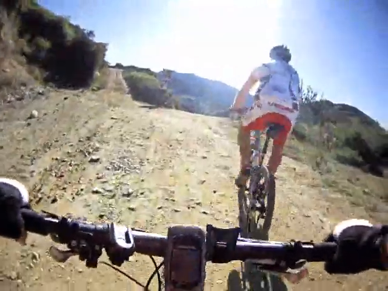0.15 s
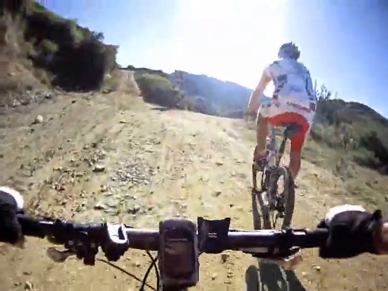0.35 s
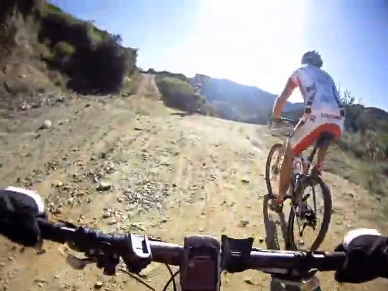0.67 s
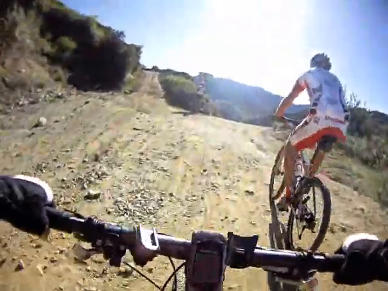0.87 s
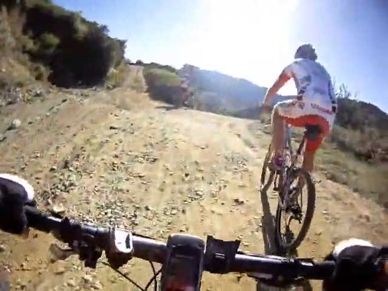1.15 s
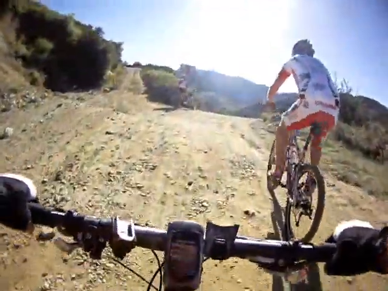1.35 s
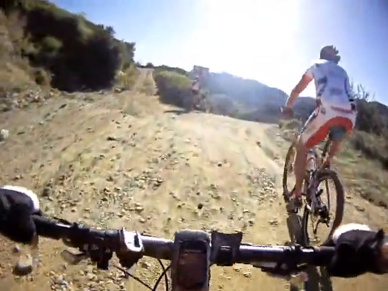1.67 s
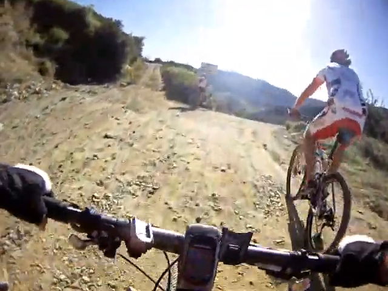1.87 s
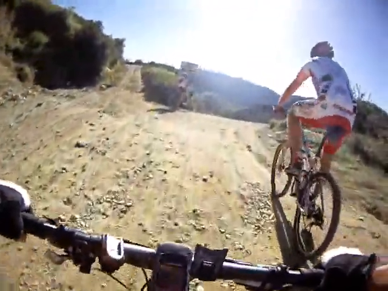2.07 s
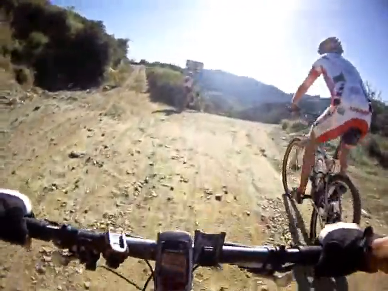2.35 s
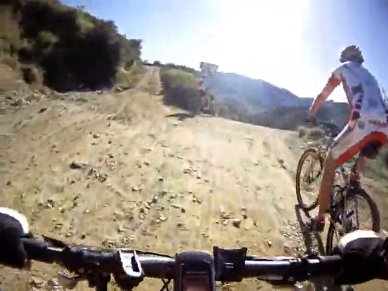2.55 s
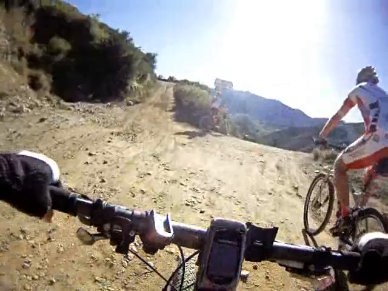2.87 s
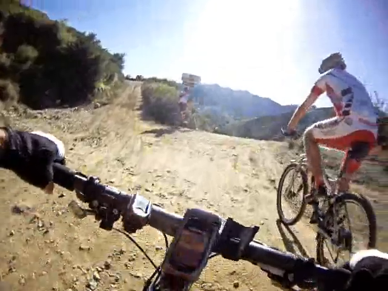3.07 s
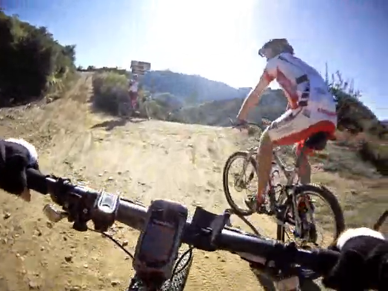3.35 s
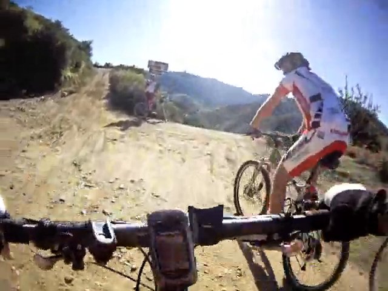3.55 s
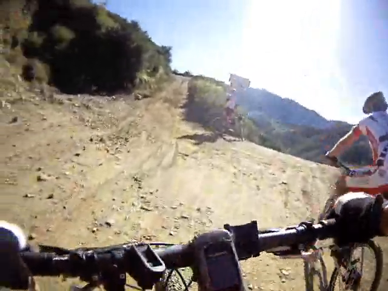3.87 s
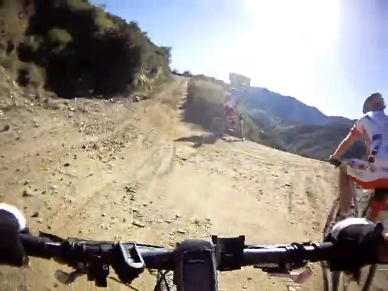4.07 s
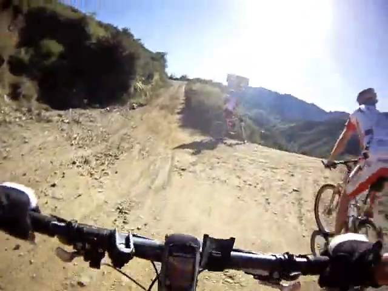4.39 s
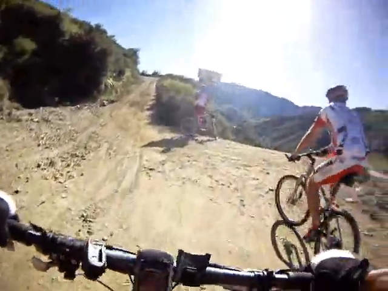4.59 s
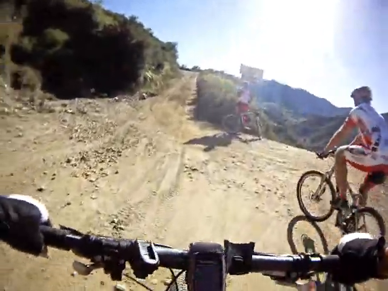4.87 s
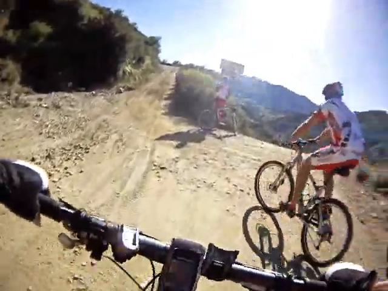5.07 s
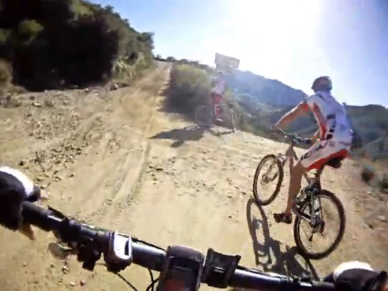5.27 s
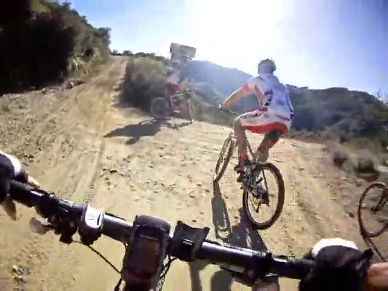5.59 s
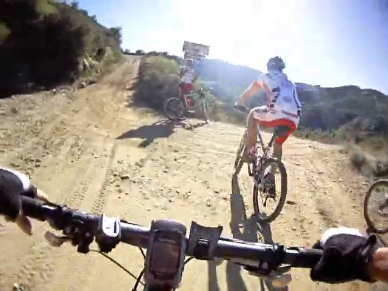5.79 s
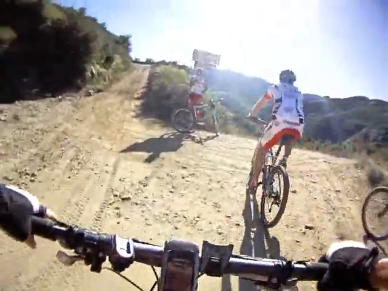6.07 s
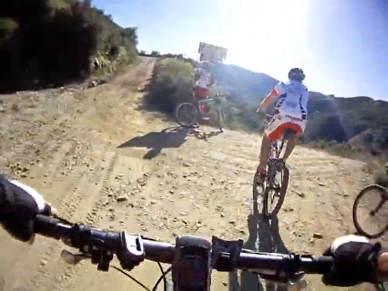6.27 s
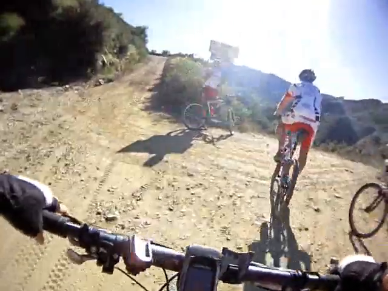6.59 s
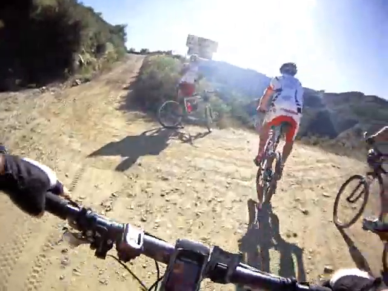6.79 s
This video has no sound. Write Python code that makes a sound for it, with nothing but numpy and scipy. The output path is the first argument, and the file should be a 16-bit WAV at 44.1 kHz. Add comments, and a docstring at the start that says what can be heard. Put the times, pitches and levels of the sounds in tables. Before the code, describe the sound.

Stones tock sharply under bicycle tyres, loose parts rattle and soft bumps thud, calming midway before hard knocks return at the end.

```python
"""A mountain bike rolls slowly over stony dirt for 6.9 s, heard inside a plastic housing on the rider.
Shaped noise and random grains rumble, crunch and hiss throughout; low decaying cycles thud at the bumps.
Up to 3.3 s hard knocks (pulsed sines with noise cracks), bursts of rattling and four harmonic cable buzzes
stand out. Softer knocks follow; dull noise clunks, one heard early, return from 4.6 s. From 6 s the bursts
return, and hard knocks close the scene."""
import sys
import numpy as np
from scipy import signal
from scipy.fft import rfft, irfft, next_fast_len
from scipy.io import wavfile
from scipy.ndimage import uniform_filter1d, map_coordinates

SR = 44100
rng = np.random.default_rng(int(sys.argv[2]) if len(sys.argv) > 2 else 0)


def dump(signal):
    """Clip the signal to [-1, 1] and save it as 16-bit WAV at the path in sys.argv[1]."""
    limited = np.clip(np.atleast_2d(signal).T, -1, 1)
    pcm = np.round(limited * 32767).astype(np.int16)
    wavfile.write(sys.argv[1], SR, pcm)


N = 305613  # samples
BOUNCE_HZ = 74  # the tyre's spring

# Spectrum of rolling and rubbing. Each row: frequency in Hz, relative density in dB per Hz.
ROLL_SPECTRUM = [(90, -32), (160, -9.5), (300, -13.5), (600, -8), (950, -10.5), (1350, -3.5), (1600, -4),
                 (2050, -22), (2350, -18.5), (2800, -12.5), (3500, -42), (7000, -53)]


def amp(db):
    """Amplitude factor of a level in dB."""
    return 10 ** (np.asarray(db) / 20)


def unit(x):
    """x at rms 1."""
    return x / np.sqrt(np.mean(x ** 2) + 1e-20)


def along(points, hz):
    """Interpolate (Hz, value) points on a log frequency axis."""
    f, v = np.transpose(points)
    return np.interp(np.log(hz + 1), np.log(f + 1), v)


def curve(rows):
    """Interpolate (s, value) rows to one value per sample."""
    s, values = np.transpose(rows)
    return np.interp(np.arange(N) / SR, s, values)


def wobble(rate_hz):
    """Smooth random curve with rate_hz knots a second."""
    knots = rng.standard_normal(int(N * rate_hz / SR) + 4)
    return map_coordinates(knots, [np.arange(N) * rate_hz / SR])


def filtered(x, response):
    """Filter x by a complex response of frequency in Hz."""
    m = next_fast_len(2 * len(x))
    return irfft(rfft(x, m) * response(np.fft.rfftfreq(m, 1 / SR)), m)[:len(x)]


def coloured(x, spectrum):
    """Shape x by a (Hz, dB) spectrum, at rms 1."""
    return unit(filtered(x, lambda hz: amp(along(spectrum, hz))))


def add(track, s, sound):
    """Mix a sound into the track at time s."""
    start = int(np.clip(round(s * SR), 0, N))
    track[start:start + len(sound)] += sound[:N - start]


def swell(t, peak_s):
    """Smooth push from t = 0 that reaches 1 at peak_s, then dies away."""
    u = np.maximum(t, 0) / peak_s
    return (u * np.exp(1 - u)) ** 2


def spread_over(x, length_s):
    """Scale x to the energy of an rms-1 sound of this length."""
    return x * np.sqrt(length_s * SR / (np.sum(x ** 2) + 1e-20))


def stirred(x, window_s):
    """Rms of x, smoothed twice over window_s."""
    size = int(window_s * SR) + 1
    power = uniform_filter1d(uniform_filter1d(x ** 2, size), size)
    return np.sqrt(np.abs(power))


def grains(rate_hz, size_db):
    """Random impulses, most small and a few large, at rms 1."""
    hits = rng.random(N) < rate_hz / SR
    signs = rng.choice([-1, 1], N)
    sizes = amp(size_db * np.minimum(rng.exponential(size=N), 3))
    return unit(hits * signs * sizes)


def housing(hz, vary_db=5.0):
    """Response of the housing's resonances to a contact force; mode strengths are redrawn each time."""
    # Each row: resonance in Hz, width in Hz, level in dB ahead of the random variation.
    mode_rows = [(560, 120, -8), (930, 220, 1), (1800, 220, -2), (2170, 180, -3), (2560, 260, -3),
                 (2830, 240, 1), (3240, 120, -1), (4260, 560, -7), (4970, 500, -10), (5750, 650, -7),
                 (7330, 450, -15), (9650, 400, -19)]
    # Force of a hard contact. Each row: frequency in Hz, level in dB.
    contact_spectrum = [(100, 2), (350, -27), (700, 2), (3200, 1.5), (3650, -7.5), (4200, 5), (6000, -3.5),
                        (7000, -8), (11000, -13)]
    gains = amp(vary_db * rng.standard_normal(len(mode_rows)))
    modes = 0
    for gain, (centre, width, db) in zip(gains, mode_rows):
        damping = 1j * hz * width
        modes = modes + gain * amp(db) * damping / (centre * centre - hz * hz + damping)
    return modes * amp(along(contact_spectrum, hz))


def crack(force, bright_db):
    """Tiny slips within a contact ring the housing; bright_db lifts the treble."""
    noise = rng.standard_normal(len(force))
    slips = noise * np.abs(noise)
    shelf = lambda hz: amp(bright_db / (1 + (3700 / (hz + 1)) ** 6))
    return filtered(force * slips, lambda hz: housing(hz) * shelf(hz))


def ripples():
    """Small bumps bounce the tyre at random, below and above its spring frequency."""
    t = np.arange(SR // 12) / SR
    out = np.zeros(N)
    for ratio in (0.7, 1.25):
        hz = ratio * BOUNCE_HZ
        bounce = unit(swell(t, 0.55 / hz) * np.sin(2 * np.pi * hz * t))
        out += signal.fftconvolve(grains(rate_hz=4, size_db=3), bounce)[:N]
    return unit(out)


def pebbles():
    """Small stones tock at random at three pitches of the main resonance, each with a faint click."""
    t = np.arange(SR // 60) / SR
    push = swell(t, 0.001)
    out = np.zeros(N)
    for hz in (1250, 1480, 1700):
        tock = unit(push * np.sin(2 * np.pi * hz * t)) + 0.3 * unit(crack(push, bright_db=-8))
        out += signal.fftconvolve(grains(rate_hz=10, size_db=4), tock)[:N]
    return unit(out)


def ground(clatter, thuds, rumble_db, roll_db):
    """Frame sway rumbles, tyres crunch pebbles and grit hisses; bumps and knocks stir up more."""
    # Each row: time in seconds, rumble level in dB ahead of the rumble_db offset.
    sway_rows = [(0.0, -62.5), (0.42, -59.5), (0.63, -64), (1.56, -59.5), (1.97, -64), (3.05, -59),
                 (3.82, -63.5), (4.38, -57), (4.67, -70.5), (4.84, -69), (5.17, -61), (6.08, -66),
                 (6.52, -64), (6.93, -68.5)]
    # Each row: time in seconds, tyre roll level in dB ahead of the roll_db offset.
    rolling_rows = [(0.0, -66.5), (0.4, -61.5), (0.93, -71.5), (1.04, -65.5), (1.93, -66), (2.45, -67.5),
                    (2.7, -62), (3.73, -71), (5.64, -66.5), (5.71, -65.5), (6.62, -62), (6.93, -71)]
    # Swaying frame. Each row: frequency in Hz, relative density in dB per Hz.
    rumble_spectrum = [(8, 7), (20, 4), (42, -2), (65, -12), (110, -20), (200, -29), (400, -42), (900, -60)]
    # Grit hiss. Each row: frequency in Hz, relative density in dB per Hz.
    grit_spectrum = [(1800, -6), (2400, -11), (2900, -7.5), (3300, -12), (3600, -7), (4300, -3), (5100, -6),
                     (6000, -2.5), (7000, -14.5), (8500, -16), (9700, -16.5), (11000, -14.5)]
    ripple_db = -13.5  # over the rumble
    shake_db, shake_s = 2.5, 0.071  # sway around a bump: level over the bump, smoothing
    scatter_db, spray_db, scatter_s = -27, -45, 0.06  # pebbles, grit: level over the knock; smoothing
    sand_db, sand_follows = -73.5, 0.16  # grit at mean roll level, dB gained per dB of roll

    rumble = amp(3 * wobble(11)) * coloured(rng.standard_normal(N), rumble_spectrum)
    rumble += amp(ripple_db) * ripples()
    crunch = 0.55 * coloured(grains(rate_hz=170, size_db=5), ROLL_SPECTRUM)
    rush = 0.65 * coloured(rng.standard_normal(N), ROLL_SPECTRUM)
    roll = amp(3.5 * wobble(30)) * (rush + crunch) + 0.9 * pebbles()
    hiss = amp(1.6 * wobble(20)) * coloured(rng.standard_normal(N), grit_spectrum)
    sand = 0.5 * coloured(grains(rate_hz=220, size_db=5), grit_spectrum)

    sway_level, roll_level = curve(sway_rows), curve(rolling_rows)
    scatter = stirred(clatter, scatter_s)
    sway = np.hypot(amp(sway_level + rumble_db), amp(shake_db) * stirred(thuds, shake_s))
    rolling = np.hypot(amp(roll_level + roll_db), amp(scatter_db) * scatter)
    sand_level = sand_db + sand_follows * (roll_level - roll_level.mean())
    spray = np.hypot(amp(sand_level), amp(spray_db) * scatter)
    return sway * rumble + rolling * roll + spray * (hiss + sand)


def bumps(rise_s):
    """The soft tyre turns a bump into one or two low cycles."""
    # Each row: peak time in seconds, peak level in dB.
    bump_rows = [(0.069, -41.5), (.18, -40.5), (1.146, -42), (1.184, -36.5), (1.227, -47), (1.566, -38),
                 (1.722, -41), (2.319, -48.5), (2.558, -41), (2.689, -39), (3.062, -40.5), (3.815, -40.5),
                 (4.181, -48), (5.306, -43), (5.681, -44), (6.397, -41), (6.432, -37.5), (6.657, -41.5),
                 (6.803, -40.5)]
    bounce_spread = 0.11  # log-frequency scatter between bumps
    out, t = np.zeros(N), np.arange(SR // 8) / SR
    for s, db in bump_rows:
        hz = BOUNCE_HZ * np.exp(bounce_spread * rng.standard_normal())
        thud = swell(t, rise_s) * np.cos(2 * np.pi * hz * (t - rise_s))
        add(out, s - rise_s, amp(db) * thud)
    return out


def clunks():
    """The largest stones strike a rim with a short, toneless low clunk: a push of shaped noise."""
    # Each row: start in seconds, length in seconds, level in dB.
    clunk_rows = [(.699, 0.0076, -60), (4.647, 0.0056, -56.5), (4.792, 0.013, -57), (5.428, 0.0029, -49),
                  (6.093, .0075, -49.5), (6.38, 0.012, -49.5), (6.428, 0.0061, -38.5)]
    # Each row: frequency in Hz, relative density in dB per Hz.
    clunk_spectrum = [(80, -16), (200, -1.5), (600, -7), (1000, 1), (1500, -47), (3000, -56)]
    out, t = np.zeros(N), np.arange(SR // 20) / SR
    for s, length_s, db in clunk_rows:
        push = swell(t, length_s / 2) * rng.standard_normal(len(t))
        add(out, s, amp(db) * spread_over(coloured(push, clunk_spectrum), length_s))
    return out


def buzzes():
    """A shaken cable slaps the frame once a cycle: a brief, rough harmonic tone."""
    # Each row: start in seconds, length in seconds, pitch in Hz, level in dB,
    # fundamental in dB on the scale of the overtones, ahead of random variation.
    buzz_rows = [(0.402, 0.049, 558, -55, 14), (0.892, 0.025, 543, -49.5, 0), (1.75, 0.057, 584, -49, -22),
                 (3.31, 0.08, 557.5, -52.5, 0.5)]
    # Overtones. Each row: multiple of the pitch, level in dB ahead of random variation.
    overtone_rows = [(2, -0.5), (3, 1.5), (4, -11), (5, -17), (6, -29)]
    out = np.zeros(N)
    drift, flutter = 1 + 0.016 * wobble(250), amp(3 * wobble(300))
    for s, length_s, hz, db, base_db in buzz_rows:
        span = np.arange(int(length_s * SR)) + int(s * SR)
        phase = 2 * np.pi * hz * np.cumsum(drift[span]) / SR
        tone = np.zeros(len(span))
        for multiple, level_db in [(1, base_db), *overtone_rows]:
            tone += amp(level_db + 2 * rng.standard_normal()) * np.sin(multiple * phase)
        rub = 0.3 * coloured(rng.standard_normal(len(span)), ROLL_SPECTRUM)
        rough = unit((unit(tone) + rub) * flutter[span])
        add(out, s, amp(db) * rough * signal.windows.tukey(len(span)))
    return out


def rattles(rate_hz, uneven, size_db, detune, rise_s):
    """A jolted loose part bounces hundreds of times a second, each bounce a small knock."""
    # Each row: start in seconds, length in seconds, ring level in dB, ring pitch in Hz ahead of
    # random detuning, crack level in dB, swell in dB over the burst.
    rattle_rows = [(0.287, 0.0512, -41.5, 1450, -46.5, 5), (0.409, 0.021, -40.5, 1480, -44, 6),
                   (0.542, 0.022, -37.5, 1494, -48, -15), (0.635, 0.05, -54, 1410, -77, -8),
                   (0.683, 0.021, -45.5, 1300, -53, 9), (0.841, 0.019, -45, 1450, -60, -11),
                   (.876, .008, -41.5, 1550, -48, -13), (0.898, 0.0063, -39.5, 1580, -48, 5),
                   (0.968, .012, -40, 1360, -57, 7), (.977, .023, -31.5, 1350, -40, -8),
                   (1.103, 0.028, -42.5, 1350, -50.5, 11), (1.164, 0.034, -53, 1430, -53.5, -22),
                   (1.414, .027, -42, 1370, -47.5, -11), (1.481, 0.04, -46.5, 1370, -54.5, -11),
                   (1.755, 0.026, -42, 1530, -55, -18), (1.847, 0.024, -42.5, 1514, -53.5, -1),
                   (2.458, 0.015, -48.5, 1610, -60, -21), (2.522, 0.013, -47, 1540, -57.5, -3),
                   (2.713, 0.059, -50, 1500, -59.5, -18), (2.784, 0.056, -53.5, 1420, -79, 16),
                   (2.941, 0.021, -54, 1480, -54, 24), (3.006, .017, -49, 1600, -49, 6),
                   (3.311, 0.017, -45, 1500, -53.5, 3), (6.002, 0.011, -50, 1560, -60.5, 4),
                   (6.042, 0.013, -49.5, 1380, -52.5, -13), (6.082, .053, -48.5, 1390, -66.5, 2),
                   (6.255, 0.016, -46, 1460, -50, 5), (6.335, 0.018, -45.5, 1420, -54.5, -10),
                   (6.398, 0.023, -39.5, 1490, -58, -26), (6.483, 0.014, -46, 1720, -54.5, 2),
                   (6.752, 0.0097, -54.5, 1590, -54.5, -2), (6.78, 0.077, -47, 1560, -49, 9.5)]
    bright_db, first_bounce_db = -7.5, -1  # treble of the cracks, accent of the first bounce
    out = np.zeros(N)
    for s, length_s, db, hz, hard_db, swell_db in rattle_rows:
        t = np.arange(int(length_s * SR) + SR // 60) / SR
        pace_hz = rate_hz * np.exp(0.19 * rng.standard_normal())
        count = min(int(max(length_s * pace_hz, 2)), 64)
        late, strong, pitch = rng.standard_normal((3, count, 1))  # one row per bounce
        bounce = np.arange(count)[:, None]
        at = np.maximum(bounce + uneven * late * (bounce > 0), 0) / pace_hz
        accent_db = np.where(bounce == 0, first_bounce_db, size_db * strong)
        force = amp(accent_db + swell_db * at / length_s) * swell(t - at, rise_s)
        bounce_hz = hz * np.exp(detune * pitch)
        ring = np.sum(force * np.sin(2 * np.pi * bounce_hz * (t - at)), axis=0)
        snaps = crack(force.sum(axis=0), bright_db)
        add(out, s, amp(db) * spread_over(ring, length_s) + amp(hard_db) * spread_over(snaps, length_s))
    return out


def knocks(ring_width_s, crack_width_s):
    """Each stone gives a hollow tock of a few cycles, with a crack that is brighter on hard contacts."""
    # Each row: time in seconds, ring level in dB, ring pitch in Hz, crack level in dB.
    knock_rows = [(0.1117, -52, 1350, -53), (0.1545, -39.5, 1390, -62), (0.19, -39, 1610, -52),
                  (0.3413, -35, 1470, -49), (0.4411, -37, 1450, -62), (0.4833, -42, 1450, -60.5),
                  (0.516, -35, 1320, -60), (0.5531, -26, 1520, -44), (0.9594, -24, 1430, -50.5),
                  (1.0183, -45, 1470, -60), (1.1291, -27, 1340, -39.5), (1.1819, -35.5, 1470, -50.5),
                  (1.199, -35, 1380, -51), (1.249, -28, 1420, -38.5), (1.2574, -42, 1560, -41),
                  (1.2647, -29.5, 1600, -48), (1.4229, -24, 1250, -40), (1.485, -25, 1520, -52),
                  (1.5014, -28.5, 1400, -50), (1.5242, -37, 1290, -53.5), (1.7198, -35.5, 1590, -58),
                  (1.7501, -26.5, 1640, -42.5), (1.8575, -36, 1500, -48.5), (1.928, -46, 1300, -50.5),
                  (2.156, -45, 1680, -51), (2.2351, -35, 1550, -69), (2.4734, -26.5, 1510, -39),
                  (2.577, -35.5, 1650, -56.5), (2.689, -36.5, 1730, -50), (2.7335, -33, 1490, -50.5),
                  (2.7971, -32, 1540, -52.5), (2.9731, -41, 1520, -49), (3.0505, -37.5, 1380, -49.5),
                  (3.0604, -38, 1600, -62), (3.1677, -41.5, 1020, -54.5), (3.2443, -20.5, 1510, -41),
                  (3.494, -43.5, 1460, -75), (3.609, -33.5, 1384, -67), (3.6698, -34, 1360, -75),
                  (3.908, -42.5, 1364, -72), (4.0567, -52, 1470, -56), (4.141, -42.5, 1550, -62),
                  (4.2068, -40, 1430, -59), (4.2408, -43, 1460, -62), (4.3926, -52, 1340, -59.5),
                  (4.4254, -40, 1380, -59), (4.775, -48.5, 1290, -51.5), (4.7995, -45, 1110, -60),
                  (4.9821, -41, 1320, -72), (5.1713, -37, 1420, -78), (5.3386, -36.5, 1460, -61),
                  (5.4287, -46, 1600, -54.5), (5.4639, -34, 1330, -47), (5.5835, -36.5, 1480, -58.5),
                  (5.6129, -41, 1570, -60), (5.7663, -37.5, 1530, -62.5), (5.7962, -38, 1490, -59),
                  (5.8269, -37, 1310, -55.5), (5.87, -35.5, 1360, -58), (5.901, -45, 1840, -59),
                  (5.916, -34.5, 1450, -45.5), (6.0831, -38, 1410, -56), (6.1002, -35.5, 1560, -55),
                  (6.116, -35, 1580, -57), (6.1481, -34, 1550, -67), (6.191, -38, 1300, -77),
                  (6.384, -34, 1340, -47), (6.428, -26.5, 1530, -40), (6.5321, -39, 1290, -72),
                  (6.574, -31.5, 1310, -42.5), (6.6301, -31.5, 1435, -49), (6.6917, -33, 1700, -61),
                  (6.707, -38, 1830, -57.5), (6.8492, -27, 1590, -42), (6.8595, -25.5, 1560, -53)]
    lead_s, peak_s, crack_s = 0.004, 0.0016, 0.005
    usual_hardness_db, brightening = -6.5, 0.65  # crack over ring; dB of treble per dB of hardness
    out, t = np.zeros(N), np.arange(SR // 30) / SR - lead_s
    press = lambda width_s: 1 / np.cosh((t - peak_s) / width_s)  # the tyre takes up the stone, lets go
    for s, db, hz, hard_db in knock_rows:
        softness = np.exp(0.15 * rng.standard_normal())
        ring = press(ring_width_s * softness) * np.sin(2 * np.pi * hz * t)
        bright_db = brightening * (hard_db - db - usual_hardness_db)
        snap = spread_over(crack(press(crack_width_s), bright_db), crack_s)
        add(out, s - lead_s, amp(db) * ring + amp(hard_db) * snap)
    return out


def after_ring(x, t60_s):
    """Frame and mount ring on after each contact: x convolved with decaying noise."""
    t = np.arange(SR // 6) / SR
    tail = rng.standard_normal(len(t)) * amp(-60 * t / t60_s)
    return signal.fftconvolve(x, tail / np.linalg.norm(tail))[:N]


def scene():
    """Mix the ground, the bike's contacts and their after-ring to one channel."""
    clatter = knocks(ring_width_s=0.00064, crack_width_s=0.00063)
    clatter += rattles(rate_hz=450, uneven=0.204, size_db=2.0, detune=0.065, rise_s=0.001)
    thuds = bumps(rise_s=0.0074)
    ringing = amp(-9.5) * after_ring(clatter, t60_s=0.026)
    bike = clatter + ringing + buzzes() + clunks() + thuds
    return (bike + ground(clatter, thuds, rumble_db=7.0, roll_db=-1.0))[None]


def record(dry):
    """The microphone channel keeps nothing from its band limit up."""
    top_hz = 11000
    return filtered(dry[0], lambda hz: hz < top_hz)[None]


dry = scene()
out = record(dry)
dump(out)
```